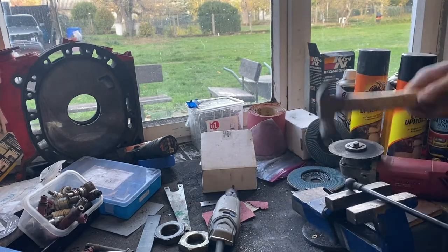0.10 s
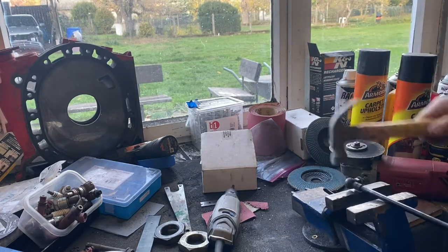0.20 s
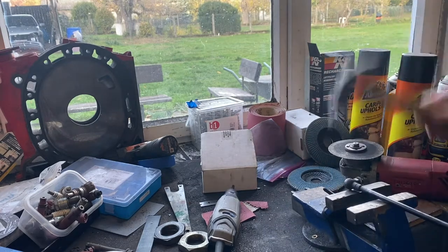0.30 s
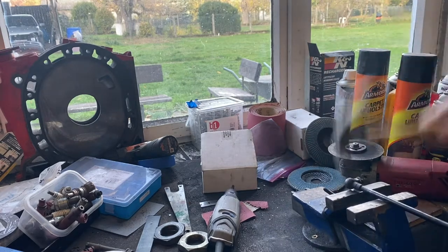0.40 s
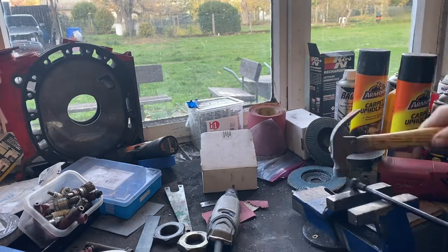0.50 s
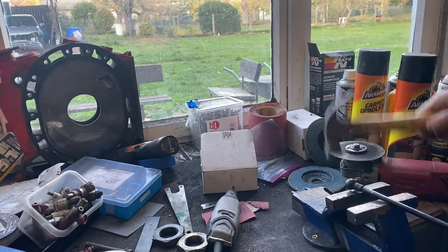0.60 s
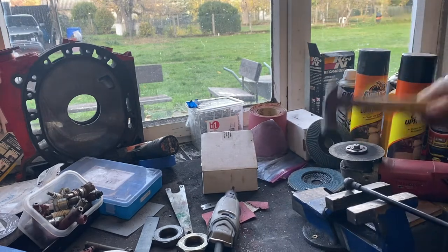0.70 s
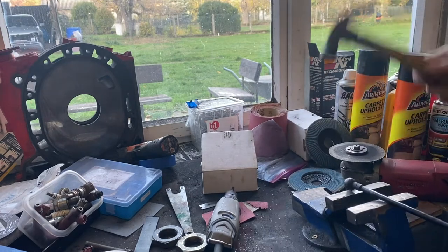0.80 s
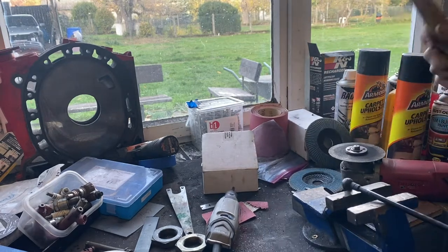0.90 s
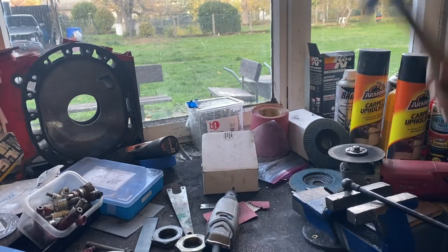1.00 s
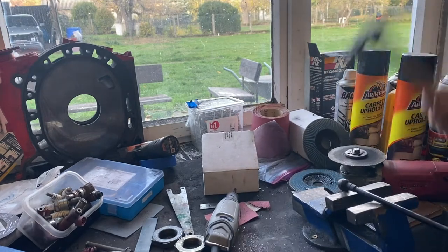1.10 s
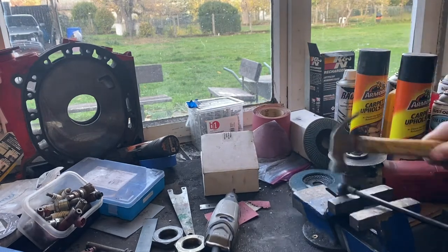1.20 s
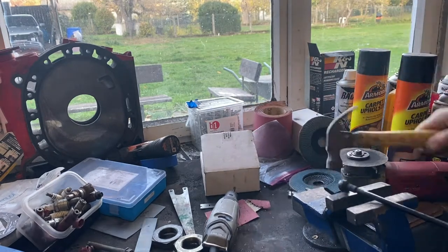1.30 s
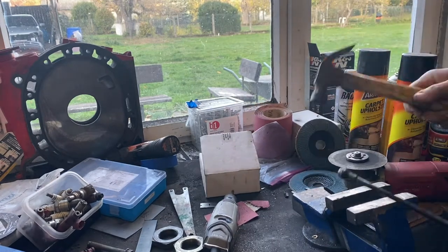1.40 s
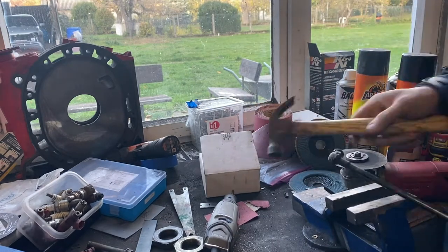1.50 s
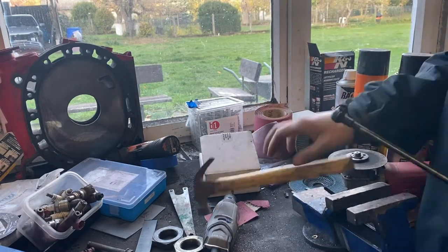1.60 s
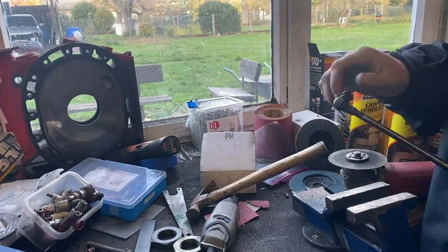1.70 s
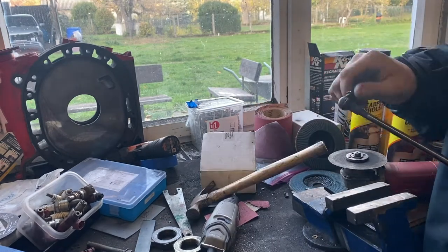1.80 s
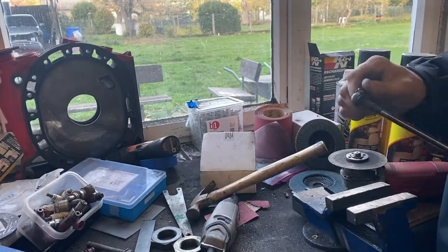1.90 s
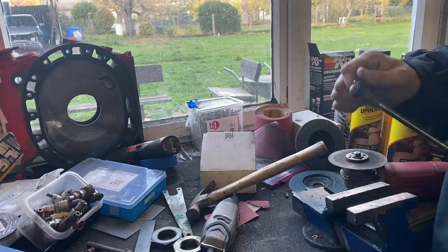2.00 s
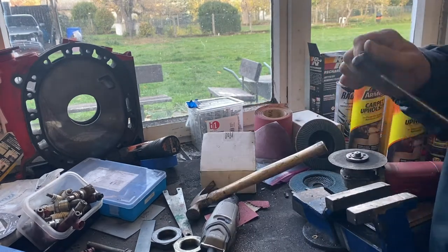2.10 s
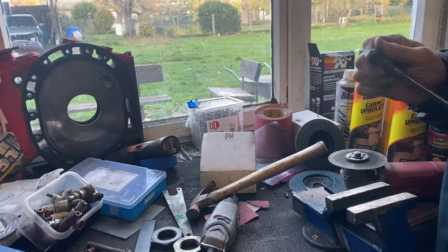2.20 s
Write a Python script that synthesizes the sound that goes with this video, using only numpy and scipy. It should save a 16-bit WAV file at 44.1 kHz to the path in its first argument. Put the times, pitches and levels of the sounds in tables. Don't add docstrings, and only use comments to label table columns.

```python
import sys
import numpy as np
from scipy import signal
from scipy.fft import rfft, irfft
from scipy.io import wavfile
from scipy.ndimage import uniform_filter1d, minimum_filter1d, map_coordinates

SR = 44100
rng = np.random.default_rng(int(sys.argv[2]) if len(sys.argv) > 2 else 0)


def transcribe(signal):
    frames = np.atleast_2d(signal).T
    limited = np.clip(frames, -1, 1)
    pcm = np.round(limited * 32767).astype(np.int16)
    wavfile.write(sys.argv[1], SR, pcm)


def natural_amplitude(level_db):
    exponent = np.asarray(level_db, float) / 20
    return 10 ** exponent


N = 97020
SPAN = 22050

# pitch_hz, level_db per Hz
HUM = [(15, -29), (30, -6), (130, 2.5), (300, -7.5), (900, -13.5), (2300, -22), (10400, -25), (16500, -46)]
HUM_DB = -71.5
# pitch_hz, level_db per Hz
CLOTH = [(240, -42), (400, -24.5), (467, -10.5), (10700, -15.5), (15700, -21), (16500, -36.5)]
# time_s, level_db
SLEEVE = [
    (0, -99),
    (.2, -77),
    (1.81, -74.5),
    (1.84, -104),
    (1.9, -82),
    (2.03, -81.5),
    (2.055, -72),
    (2.072, -64),
    (2.09, -74),
    (2.2, -72.5),
]

# pitch_hz, likeness (0 to 1)
ALIKE = [(60, 1), (380, 0.56), (1500, 0.073), (5000, 0.11), (7500, 0.51), (12000, .93)]
# pitch_hz, left_lead_radians
PORT_LEAD = [(6900, 0), (9050, -np.pi), (11150, -2 * np.pi), (13300, -3 * np.pi), (15400, -4 * np.pi),
             (17000, -4.7 * np.pi)]
# pitch_hz, left_over_right_db
LEFT_OVER_RIGHT = [(60, 1), (180, -1.5), (550, 0.0), (1650, 1.5), (4970, 3), (15000, -3)]

# pitch_hz, level_db per Hz
ROOM = [(60, -38.5), (100, -6), (1000, -8.5), (4100, -18), (7600, -19), (11000, -23.5), (15500, -30.5),
        (16800, -64)]
# pitch_hz, t60_s
ROOM_T60 = [(150, 0.52), (500, 0.25), (1200, 0.22), (3000, 0.26), (8000, 0.17), (15000, 0.27)]
ROOM_RISE_S = 0.0031

# start_s, pitch_hz, level_db, t60_s
KNOCKS = [(1.375, 116.5, -26, 0.23), (1.46, 60, -53, 0.46), (1.625, 244, -27.5, 0.082),
          (1.626, 122, -26, 0.16), (1.63, 2460, -42, .02), (1.666, 2080, -38.5, 0.028),
          (1.667, 165, -30.5, 0.11), (1.668, 92.4, -22, 0.15), (1.671, 715, -28.5, 0.024),
          (1.686, 2440, -44, 0.036), (1.714, 850, -34, 0.029), (1.718, 118.9, -23, 0.24),
          (1.724, 173.8, -31.5, 0.31), (1.732, 475, -37.5, .05), (1.756, 218, -34, 0.088)]
# start_s, tick_db, boom_db, clatter_db
LAID = [
    (1.624, -45.5, -34, -37),
    (1.665, -30, -25, -29),
    (1.713, -41.5, -28, -30.5),
    (1.723, -59, -25, -32.5),
    (1.734, -57, -35, -37.5),
]
# start_s, tick_db, boom_db, clatter_db
SETTLING = [
    (1.794, -45, -46.5, -61),
    (1.815, -77, -54.5, -72),
]
# pitch_hz, level_db, t60_s
BENCH_TOP = [(60, -2, 0.17), (79, -22, 0.11), (105, 4.5, 0.18), (131.7, -2.5, 0.23), (160.7, 2, 0.24),
             (261.3, -4.5, 0.1), (362, -9, 0.06), (546, -13, 0.055)]
# pitch_hz, level_db, t60_s
DRONE = [(132, -43.5, 0.47), (165, -49.5, 0.34)]
# pitch_hz, level_db per Hz
CLATTER = [(120, -44.5), (200, -9.5), (6320, -50), (8970, -47), (11600, -58), (15600, -56), (16500, -82.5)]
CLATTER_T60_S = 0.16
LAID_CUT_S, LAID_CUT_DB = 1.754, -9.5

# start_s, peak_db, then over the peak bench_boom_db, head_ring_db, part_clank_db
BLOWS = [(0.242, -11.5, -10.5, -22.5, -39), (0.359, -8.5, -18, -28.5, -44), (0.453, -5, -18, -33, -30),
         (0.546, -5.5, -26, -28, -11), (0.633, -2.5, -19, -30, -21), (0.721, -5, -23, -26.5, -11),
         (0.811, -4, -18.5, -30, -3), (0.895, -1, -29, -40, -16), (0.983, -4, -16.5, -26.5, -16.5),
         (1.069, -3, -19, -29.5, -25.5), (1.163, -8.5, -8, -22.5, -37), (1.254, -8, -12, -12, -19.5),
         (1.34, -4.5, -20, -22, -16.5)]
# tail_kept_s, drop_db, room_db over the peak, crack_rise_s
CUTS = [(0.05, -6, -10.5, 0.0008), (0.054, -11, -11.5, 0.0019), (.08, -7.5, -15.5, 0.00035),
        (0.096, -8, -16, 0.0009), (0.079, -8, -19.5, 0.0032), (0.075, -10.5, -13, 0.0005),
        (0.062, -6, -14.5, 0.0079), (0.083, -4.5, -20, 0.0012), (.068, -8.5, -13.5, 0.0004),
        (0.0745, -5.5, -16.5, 0.00045), (.064, -6.5, -11.5, 0.00055), (0.077, -10.5, -13.5, 0.00028),
        (0.1236, -10.5, -14, 0.00027)]
CUT_FADE_S, CUT_GAP_S, CUT_RETURN = 0.0029, 0.0078, 0.35
# swell_s, brightness_db per octave
BOOMS = [(0.0029, 6.5), (0.0016, 2), (0.0016, 5.5), (.01, -2), (0.002, 5), (0.033, -4), (0.0057, 1.5),
         (0.0095, -1.5), (0.0017, 3), (0.02, -0.5), (0.0022, 2.5), (0.0067, 2.5), (0.0078, 1.5)]
SNAP_LEVELS = [1, 0, -3, -3, -0.5, -2.5, 1.5, -1.5, -2, -3.5, 0, 7.5, 3.5]
# pitch_hz, level_db over the peak, pitch_hz, level_db
CLANKS = [(840, -14.5, 1591, -9.5), (850, -16.5, 1500, -11.5), (1207, -16, 1930, -11),
          (1124, -12.5, 1750, -10.5), (960, -14, 1400, -8.5), (1378, -15, 3880, -14), (1068, -15, 960, -4),
          (946, -21, 1800, -17.5), (1260, -19, 2400, -30), (1290, -16.5, 2300, -15.5),
          (1550, -15.5, 1400, -16.5), (3370, -18, 4300, -14.5), (983, -15.5, 2492, -15.5)]
CLANK_T60_S, CLANK_PAIR = 0.035, 0.04
# pitch_hz, level_db over the peak, pitch_hz, level_db
THUDS = [(306.6, -19.5, 180, -22), (245, -19, 230, -28.5), (330.3, -29.5, 67, -26), (135.4, -24, 188, -31),
         (180, -24, 260, -28.5), (179.5, -23, 160, -32), (218, -25, 275, -23), (276, -29, 150, -31),
         (225, -26, 129, -26), (127, -25.5, 260, -24.5), (175.8, -18, 78, -18.5), (181.9, -11.5, 59, -24),
         (193, -23, 120, -29)]
THUD_T60_S, THUD_RISE_S = 0.33, 0.011
# pitch_hz, level_db per Hz
CRACK = [(120, -34), (200, -3), (3130, -3.5), (3770, -8), (4970, -8), (7880, -14), (8970, -16.5),
         (11400, -12), (16500, -51)]
CRACK_DB, CRACK_T60_S = -8, 0.025
LEAD_IN_DB, LEAD_IN_S = -27, 0.0006
# pitch_hz, level_db per Hz
SNAP = [(1500, -35), (3000, -11), (8000, 4.5), (11000, 0.5), (15500, -5), (16500, -22.5), (17200, -35)]
SNAP_DB, SNAP_T60_S = -7, 0.024
# pitch_hz, level_db, t60_s
PART = [(1210, 0, 0.028), (1630, -2.5, 0.099), (2100, -4.5, 0.03), (2410, 1.5, 0.041), (5800, -24, 0.0085)]
PART_DB = -24.5
# pitch_hz, level_db, t60_s
FLANGE = [(3731, 9.5, 0.014)]
# pitch_hz, level_db, t60_s
BENCH = [(40, -5, 0.56), (70, 0, 0.19), (105, -9.5, 0.16), (122.3, -10, 0.3), (179.2, -7, 0.15),
         (220, -0.5, 0.12), (284.7, -1.5, 0.15), (324, -0.5, 0.12), (431, 1, 0.017)]
BENCH_DB = -7
HEAD_HZ = [4542, 7500, 7420, 10958, 11000, 10915, 12260, 14386, 15045, 15145]
HEAD_LEVELS = [-9.5, -4.5, -9.5, -4, -9.5, -4, -15, -18, -10, -7]
HEAD_DB, HEAD_T60_S = -1, 0.045
HEAD_ECHO_DB, HEAD_ECHO_T60_S = 5, 0.15

# from_hz, to_hz
STARVED_MID = [(8600, 9500), (12700, 13900), (15800, 17200)]
# from_hz, to_hz
STARVED_SIDE = [(6750, 7100), (10400, 11900), (14600, 17200)]
# from_hz, to_hz
WEAK = [(8200, 8600), (9500, 9900), (9900, 10400), (11300, 11900), (11900, 12400), (12400, 12700),
        (12700, 13200), (13200, 13900), (13900, 14250), (14250, 14600), (14600, 14900), (14900, 15350),
        (15350, 15800)]
# from_s, to_s
SPARED = [
    (.48, .525),
    (.83, .87),
    (1.015, 1.05),
]
SPARED_DB, MASKED_DB, FAINT_DB, ATTACK_DB = -10.5, -12.5, -110, 6


def unit(x):
    return x / np.sqrt(np.mean(x ** 2) + 1e-20)


def along(points, hz):
    point_hz, value = np.transpose(points)
    return np.interp(np.log(hz + 1), np.log(point_hz + 1), value)


def ports(hz):
    left = natural_amplitude(along(LEFT_OVER_RIGHT, hz) / 2) * np.exp(0.5j * along(PORT_LEAD, hz))
    return np.array([left, 1 / left])


def rush(spectrum, size=SPAN, apart=1):
    hz = np.fft.rfftfreq(size, 1 / SR)
    a, b = rfft(rng.standard_normal((2, size))) * natural_amplitude(along(spectrum, hz))
    likeness = np.clip(along(ALIKE, hz), 0, 1)
    turn = np.clip(apart * np.arccos(likeness) / 2, 0, np.pi / 4)
    left = np.cos(turn) * a + np.sin(turn) * b
    right = np.cos(turn) * a - np.sin(turn) * b
    return unit(irfft(ports(hz) * [left, right], size))


def burst(rise_s, t60):
    t = np.arange(SPAN) / SR
    return (1 - np.exp(-(t / rise_s) ** 2)) * natural_amplitude(-60 * t / t60)


def ring(modes, rise_s, scatter_db, detune, tilt_db=0):
    hz, db, t60 = np.transpose(modes)[..., None]
    t = np.arange(SPAN) / SR
    pitch_luck, level_luck, phase_luck = rng.standard_normal((3, len(modes), 1))
    hz = hz * (1 + detune * pitch_luck)
    tilt = tilt_db * np.log2(hz / 130)
    size = natural_amplitude(db + scatter_db * level_luck + tilt - 60 * t / t60)
    wave = size * np.exp(2j * np.pi * (hz * t + phase_luck))
    return (ports(hz) * wave).imag.sum(1) * (1 - np.exp(-(t / rise_s) ** 2))


def add(out, s, x):
    out[:, round(s * SR):][:, :SPAN] += x


def step(t, s):
    return (1 + np.tanh((t - s) / CUT_FADE_S)) / 2


def scene_change(kept, drop_db):
    t = np.arange(SPAN) / SR
    return natural_amplitude(drop_db * (step(t, kept) - CUT_RETURN * step(t, kept + CUT_GAP_S)))


def quiet():
    t = np.arange(N) / SR
    slow_and_fast = [[0 * t, 0 * t + 1], [8 * t, 35 * t]]
    hum_waver, cloth_waver = map_coordinates(rng.standard_normal((2, 90)), slow_and_fast)
    cloth_db = np.interp(t, *np.transpose(SLEEVE))
    hum = natural_amplitude(HUM_DB + 1.5 * hum_waver) * rush(HUM, size=N)
    return hum + natural_amplitude(cloth_db + 1.7 * cloth_waver) * rush(CLOTH, size=N)


def garage(apart=1):
    hz, t, z = signal.stft(rush(ROOM, apart=apart), SR, nperseg=512)
    decay = natural_amplitude(-60 * t / along(ROOM_T60, hz)[:, None])
    tail = signal.istft(z * decay, SR, nperseg=512)[1][:, :SPAN]
    return tail * burst(ROOM_RISE_S, 100)


def knocks():
    out, t = np.zeros((2, N + SPAN)), np.arange(SPAN) / SR
    for s, hz, db, t60 in KNOCKS:
        trim = natural_amplitude(LAID_CUT_DB * step(t, LAID_CUT_S - s) * (s < LAID_CUT_S))
        add(out, s, ring([(hz, db, t60)], 1 / hz, 0, 0) * trim)
    return out[:, :N]


def contacts(rows):
    out = np.zeros((2, N + SPAN))
    for s, tick_db, boom_db, clatter_db in rows:
        tick = natural_amplitude(tick_db) * rush(CRACK) * burst(0.0003, 0.018)
        clatter = natural_amplitude(clatter_db) * rush(CLATTER) * burst(0.0033, CLATTER_T60_S)
        boom = natural_amplitude(boom_db - 8) * ring(BENCH_TOP, 0.0057, scatter_db=4.5, detune=0.015)
        add(out, s, tick + clatter + boom)
    return out[:, :N]


def laid_down():
    drone = np.zeros((2, N + SPAN))
    add(drone, LAID_CUT_S, ring(DRONE, 0.01, scatter_db=0, detune=0))
    trim = natural_amplitude(LAID_CUT_DB * step(np.arange(N) / SR, LAID_CUT_S))
    return contacts(LAID) * trim + contacts(SETTLING) + drone[:, :N]


def struck_spot():
    out = np.zeros((2, N + SPAN))
    for (s, db, *_), (kept, drop_db, _, rise), clank, thud in zip(BLOWS, CUTS, CLANKS, THUDS):
        twins = [(hz * (1 + side * CLANK_PAIR), level, CLANK_T60_S)
                 for hz, level in np.reshape(clank, (2, 2)) for side in (-0.5, 0.5)]
        low = [(hz, level, THUD_T60_S) for hz, level in np.reshape(thud, (2, 2))]
        sound = ring(twins, rise, 0, 0) + ring(low, THUD_RISE_S, 0, 0)
        add(out, s - 0.001, natural_amplitude(db) * scene_change(kept, drop_db) * sound)
    return out[:, :N]


def head_ring():
    modes = [(hz, db, HEAD_T60_S) for hz, db in zip(HEAD_HZ, HEAD_LEVELS)]
    direct = ring(modes, 0.00056, scatter_db=2.5, detune=0.0012)
    walls = rng.standard_normal(SPAN) * burst(0.011, HEAD_ECHO_T60_S)
    walls = walls[None] / np.linalg.norm(walls)
    return direct + natural_amplitude(HEAD_ECHO_DB) * signal.fftconvolve(direct, walls, axes=1)[:, :SPAN]


def hammer():
    out, t = np.zeros((2, N + SPAN)), np.arange(SPAN) / SR
    for blow, cut, (swell, tilt_db), square_db in zip(BLOWS, CUTS, BOOMS, SNAP_LEVELS):
        s, db, boom_db, ring_db, clank_db = blow
        kept, drop_db, room_db, rise = cut
        crack = natural_amplitude(CRACK_DB) * rush(CRACK, apart=0.82) * burst(rise, CRACK_T60_S)
        snap_db = SNAP_DB + square_db + 0.23 * (clank_db + 11.5)
        snap = natural_amplitude(snap_db) * rush(SNAP, apart=0.59) * burst(rise, SNAP_T60_S)
        part = natural_amplitude(PART_DB) * ring(PART, rise, scatter_db=4.5, detune=0.019)
        flange = natural_amplitude(clank_db) * ring(FLANGE, rise, scatter_db=1, detune=0.007)
        head = natural_amplitude(ring_db + HEAD_DB) * head_ring()
        room = natural_amplitude(room_db) * garage()
        boom = natural_amplitude(boom_db + BENCH_DB) * ring(BENCH, swell, scatter_db=3, detune=0.04, tilt_db=tilt_db)
        sound = crack + snap + part + flange + head + room + boom
        add(out, s - 0.001, natural_amplitude(db) * sound * scene_change(kept, drop_db))
        lead_in = rush(CRACK) * np.exp(-np.abs(t - 0.02) / LEAD_IN_S)
        add(out, s - 0.02, natural_amplitude(db + LEAD_IN_DB) * lead_in)
    return out[:, :N]


def scene():
    return hammer() + laid_down() + quiet() + struck_spot() + knocks()


def hold_blocks(values):
    count = values.shape[-1]
    frame = np.minimum(np.arange(count), count // 8 * 8 - 1)
    return np.repeat(values[..., 4::8], 8, axis=-1)[..., frame]


def thin_treble(x):
    mid_side = np.array([x[0] + x[1], x[0] - x[1]]) / 2
    hz, t, z = signal.stft(mid_side, SR, nperseg=512, noverlap=384)
    power = np.abs(z) ** 2 + 1e-20
    treble = power[:, hz > 3000].mean((0, 1))
    attack = treble / np.roll(treble, 2) > natural_amplitude(2 * ATTACK_DB)
    held = -minimum_filter1d(-1.0 * attack, size=3) > 0
    spared = np.any([(t > a) & (t < b) for a, b in SPARED], axis=0)
    for channel, bands in enumerate([STARVED_MID, STARVED_SIDE]):
        for lo, hi in bands:
            z[channel, (hz > lo) & (hz < hi)] *= np.maximum(held, natural_amplitude(SPARED_DB) * spared)
    smooth = uniform_filter1d(power, size=8, axis=2)
    masker = smooth[:, (hz > 6000) & (hz < 16000)].max((0, 1))
    for lo, hi in WEAK:
        band = (hz > lo) & (hz < hi)
        level = smooth[:, band].max(1)
        audible = (level > natural_amplitude(2 * MASKED_DB) * masker) & (level > natural_amplitude(2 * FAINT_DB))
        z[:, band] *= (held | hold_blocks(audible))[:, None]
    z = z * (hz < 16900)[:, None]
    mid, side = signal.istft(z, SR, nperseg=512, noverlap=384)[1][:, :N]
    return np.array([mid + side, mid - side])


def top_cut(x):
    return signal.sosfilt(signal.butter(12, 17160, fs=SR, output="sos"), x)


def record(dry):
    soft = dry / (1 + np.abs(dry / 0.95) ** 6) ** (1 / 6)
    mix = thin_treble(soft)
    return top_cut(mix)


dry = scene()
out = record(dry)
transcribe(out)
```